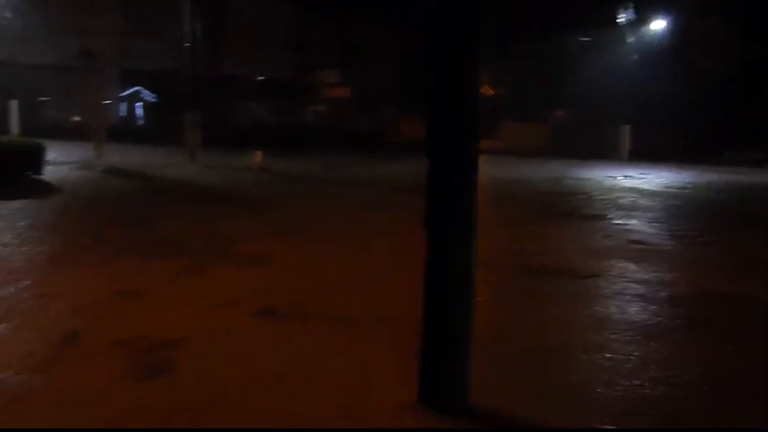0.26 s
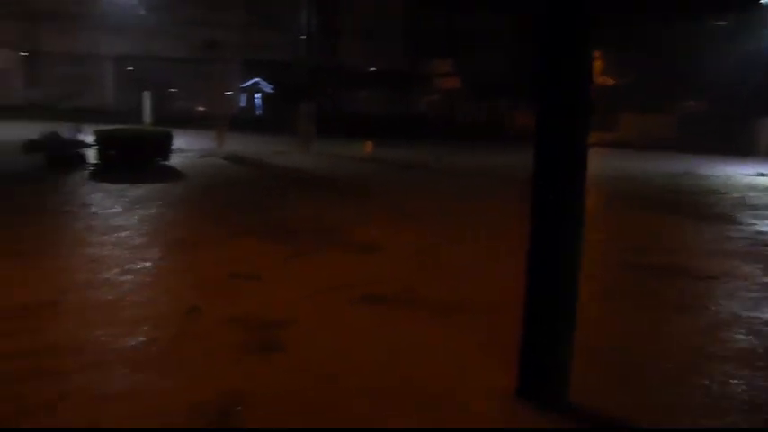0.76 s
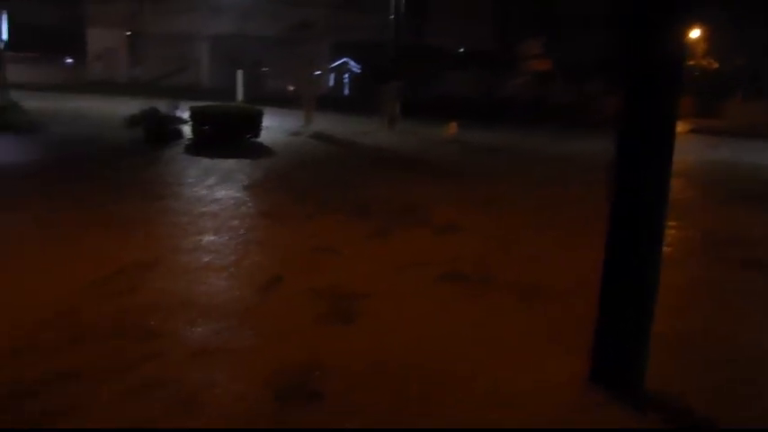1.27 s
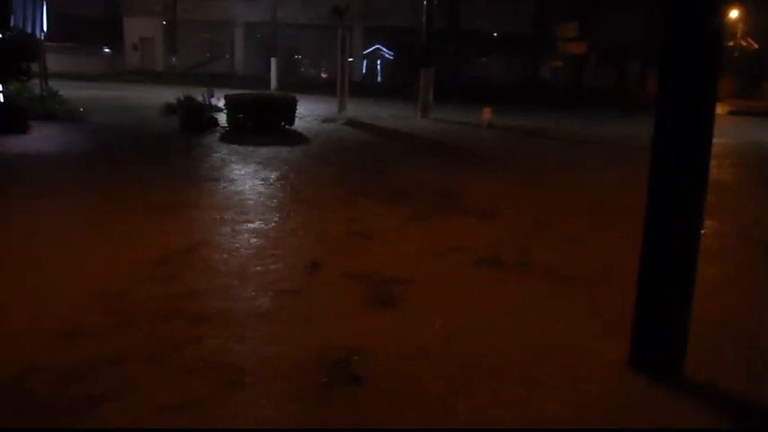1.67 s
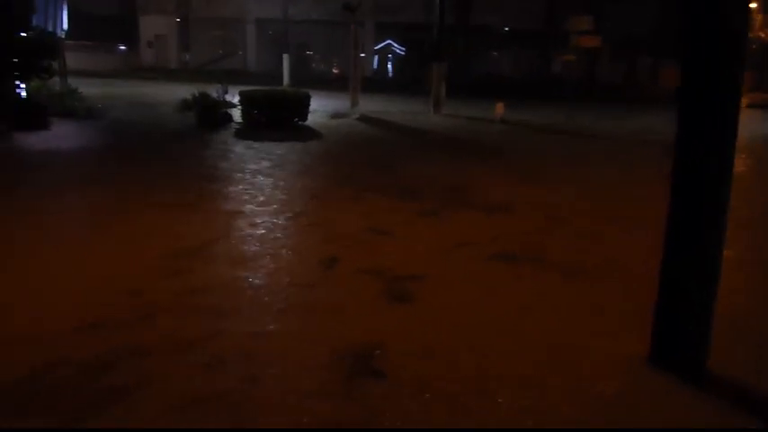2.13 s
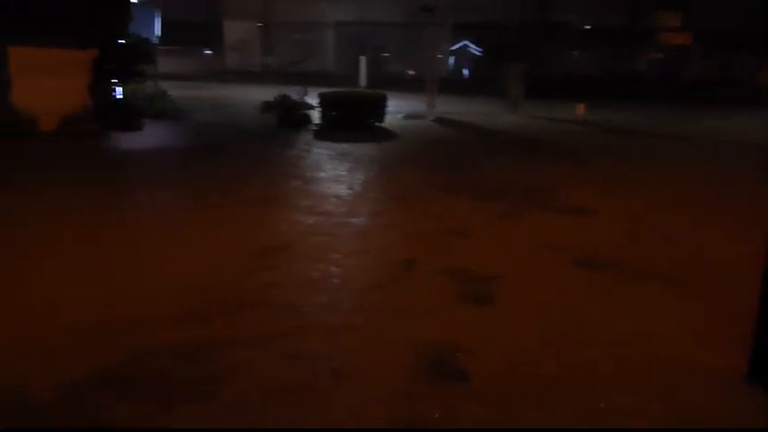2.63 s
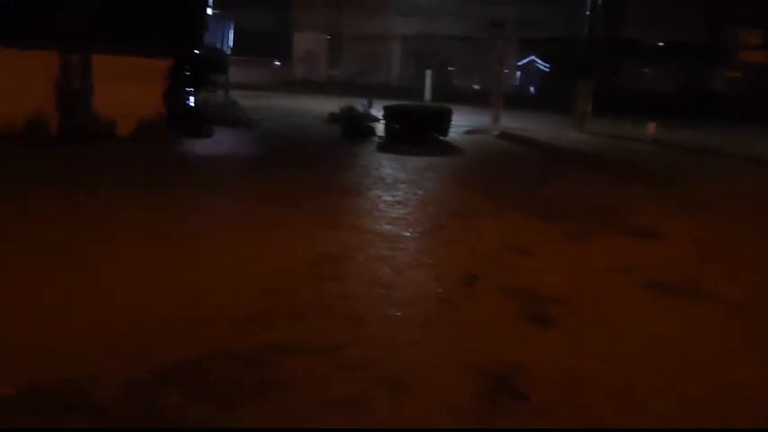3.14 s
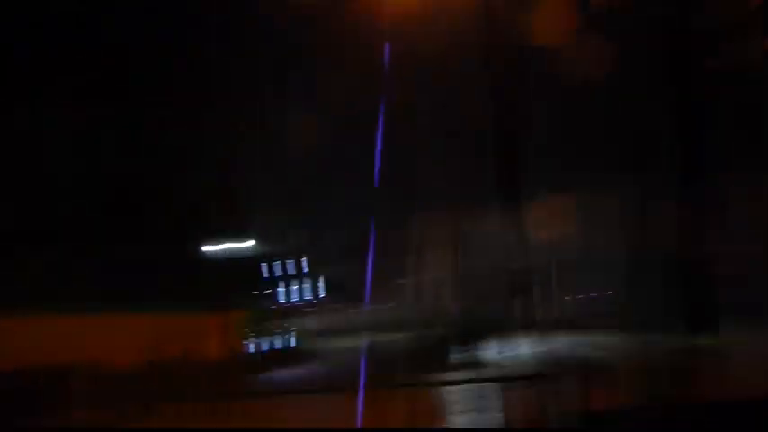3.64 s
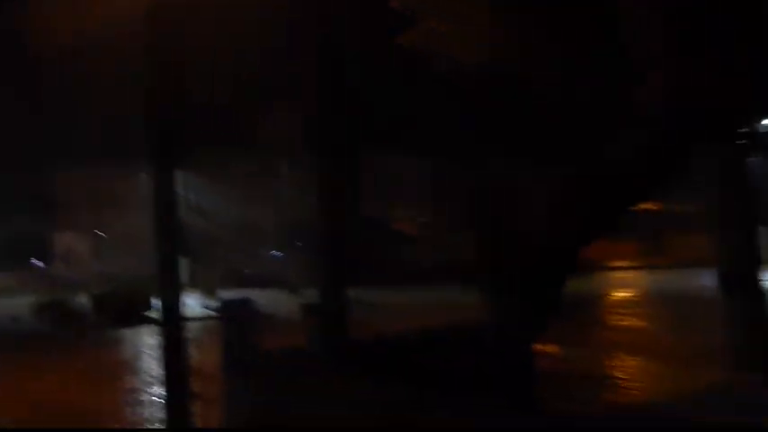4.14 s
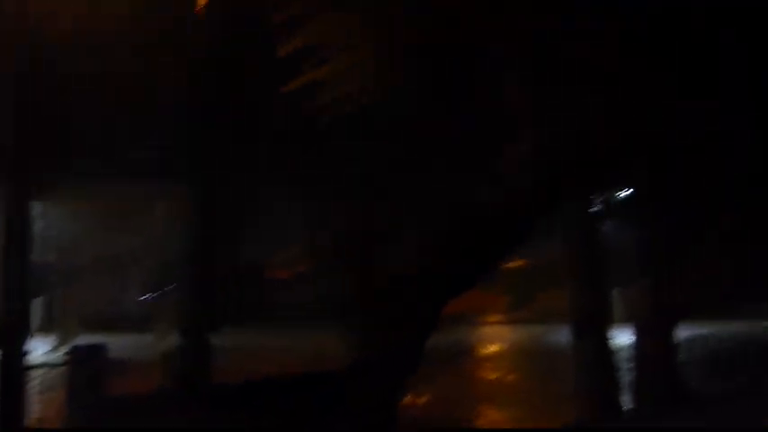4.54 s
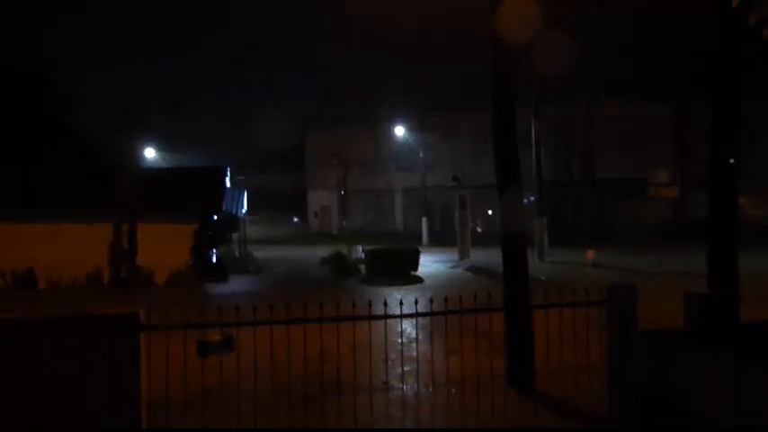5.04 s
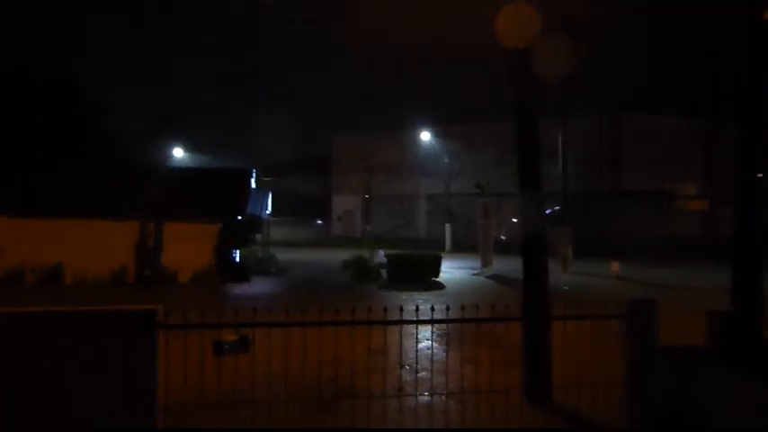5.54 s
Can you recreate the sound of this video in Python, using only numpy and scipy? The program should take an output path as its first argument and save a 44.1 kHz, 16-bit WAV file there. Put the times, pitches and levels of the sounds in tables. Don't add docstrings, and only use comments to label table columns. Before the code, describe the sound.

Heavy night rain drums on a taut umbrella overhead, then after brief silences opens into a hissing flooded street with faint bubble plinks.

```python
import sys
import numpy as np
from scipy import signal
from scipy.fft import rfft, irfft, next_fast_len
from scipy.io import wavfile
from scipy.ndimage import uniform_filter1d, map_coordinates

SR = 44100
rng = np.random.default_rng(int(sys.argv[2]) if len(sys.argv) > 2 else 0)


def master(y):
    cut = np.clip(np.atleast_2d(y).T, -1, 1)
    pcm = np.round(cut * 32767)
    wavfile.write(sys.argv[1], SR, pcm.astype(np.int16))


def gain_from_decibels(decibels):
    exponent = np.asarray(decibels, float) / 20
    return 10 ** exponent


N = 255780

# start/s, end/s
SHOTS = [
    (0, 3.2672),
    (3.8140, 4.8195),
    (4.9218, 5.81),
]
# f/Hz, likeness/0-1
SHELTERED = [(60, 0.84), (180, 0.92), (550, 1), (1650, 0.68), (4970, 0.48), (15000, 0.54)]
# f/Hz, likeness/0-1
OPEN = [(60, 0.93), (180, 0.99), (550, 0.94), (1650, 0.57), (4970, 0.21), (15000, 0.084)]


def unit(x):
    return x / np.sqrt(np.mean(x ** 2) + 1e-20)


def along(points, hz):
    f, v = np.transpose(points)
    return np.interp(np.log(hz + 1), np.log(f + 1), v)


def curves(rows):
    s, *cols = np.transpose(rows)
    return [np.interp(np.arange(N) / SR, s, c) for c in cols]


def wobble(rate):
    knots = rng.standard_normal(int(N * rate / SR) + 4)
    return map_coordinates(knots, [np.arange(N) * rate / SR])


def filtered(x, response):
    m = next_fast_len(N + 8192)
    return irfft(rfft(x, m) * response(np.fft.rfftfreq(m, 1 / SR)), m)[..., :N]


def rush(spectrum, alike, patchy_db):
    z = signal.stft(rng.standard_normal((2, N)), nperseg=512)[2]
    field = uniform_filter1d(rng.standard_normal(z.shape[1:]), size=6, axis=0)
    field = uniform_filter1d(field, size=10, axis=1)
    pair = signal.istft(z * gain_from_decibels(patchy_db * unit(field)), nperseg=512)[1][:, :N]

    def mid_side(hz):
        turn = np.arccos(np.clip(along(alike, hz), 0, 1)) / 2
        return gain_from_decibels(along(spectrum, hz)) * [np.cos(turn), np.sin(turn)]

    mid, side = filtered(pair, mid_side)
    return unit(np.array([mid + side, mid - side]))


def grains(s, db, hz, pan_db, lag_s, shape, size):
    out = []
    for side in (.5, -.5):
        start = (s + side * lag_s) * SR
        at = np.ceil(start)[:, None] + np.arange(size)
        cycles = (at - start[:, None]) / SR * hz[:, None]
        wave = gain_from_decibels(db + side * pan_db)[:, None] * shape(cycles)
        place = np.clip(at, 0, N).astype(int)
        out.append(np.bincount(place.ravel(), wave.ravel(), N + 1)[:N])
    return np.array(out)


def bursts(s, db, t60):
    hits = np.bincount(np.round(s * SR).astype(int), gain_from_decibels(db) ** 2, N)[:N]
    power = signal.lfilter([1], [1, -gain_from_decibels(-120 / (abs(t60) * SR))], hits)
    return np.sqrt(np.abs(power))


def heavy_drops(count=150):
    # t/s, peak level/dB, cloth pitch f/Hz, left-right/dB
    big_drops = [(0.0288, -10, 920, -3), (0.0638, 3, 960, -3.5), (0.0665, -19, 920, -2),
                 (0.1099, -4, 1000, -3), (0.202, -7.5, 1100, 2.5), (0.5109, -9.5, 1700, -1),
                 (0.5807, -10, 960, -3), (0.6293, -2, 1300, -2), (0.6978, -13, 960, -0.5),
                 (0.7794, -18, 1050, 4), (0.9197, -15, 1160, 0), (0.9464, -7.5, 1050, -5),
                 (1.0856, -5, 1300, -1), (1.4631, -8.5, 1000, 1), (1.53, -12.5, 1000, -3.5),
                 (1.5702, -7, 1100, -1), (1.6254, -3.5, 1380, -4), (1.709, -6, 1380, -5),
                 (1.7164, -5.5, 850, -0.5), (1.773, -10, 960, 1), (1.7793, -5, 920, -3.5),
                 (1.8651, -8, 960, -2.5), (1.9828, -0.5, 1100, -3), (2.2033, -10, 1050, 0.5),
                 (2.2585, -6.5, 1220, 6), (2.3478, -6.5, 1300, -6), (2.4555, -3.5, 1050, -5.5),
                 (2.8566, -4.5, 1220, -4.5), (3.0732, -7.5, 1000, -4), (3.1092, -6.5, 1380, -6)]
    usual_db, usual_hz = -10.5, 1084
    when = (np.arange(count) + 2 * rng.random(count)) * SHOTS[0][1] / (count + 1)
    luck = rng.standard_normal((count, 3))
    mid_db = usual_db + 2.5 * np.clip(luck[:, 0], -3, 1.5)
    mid_hz = usual_hz * np.exp(.14 * luck[:, 1])
    middling = np.column_stack([when, mid_db, mid_hz, .2 + luck[:, 2]])
    s, db, hz, pan_db = np.transpose(np.vstack([big_drops, middling]))
    crack_db = -13 - 7.5 * np.log2(hz / usual_hz) - .4 * (db - usual_db)
    crack_db = crack_db + 7.5 * np.tanh(rng.standard_normal(len(s)))
    return s, db, hz, crack_db, pan_db


def push(cycles):
    envelope = (1 - np.exp(-cycles / .11)) * np.exp(-(cycles / 1.2) ** 2.2)
    return envelope * np.sin(2 * np.pi * (.9 * cycles) ** .8)


def umbrella(count=2400):
    # t/s, level/dB
    patter_level = [(0, -18.5), (.12, -32.5), (.42, -24.5), (.85, -26.5), (1.2, -25), (1.33, -24),
                    (1.5, -24), (1.69, -19.5), (1.81, -26.5), (2.25, -22.5), (2.41, -22.5), (2.7, -20),
                    (2.9, -22.5), (3.02, -20.5), (3.26, -25.5)]
    # f/Hz, level/dB per Hz
    crack_spectrum = [(600, -7.5), (1500, 0.5), (3000, 2.5), (6000, -2.5), (10000, -5.5), (13000, -19.5),
                      (16000, -39)]
    s, db, hz, crack_db, pan_db = heavy_drops()
    lag_s = 4e-5 * rng.standard_normal(len(s))
    big = grains(s + .03 / hz, db + .2, hz, pan_db + .97, lag_s, push, size=220)
    crack = bursts(s + .09 / hz, db + crack_db + 1, t60=.0058)

    chance = np.column_stack([rng.random((count, 2)), rng.standard_normal((count, 3))])
    small_s = chance[:, 0] * SHOTS[0][1]
    small_db = -3.5 * np.log(chance[:, 1] + .07)
    small_hz = 1000 * np.exp(.31 * chance[:, 2])
    patter = grains(small_s, small_db, small_hz, 2.5 * chance[:, 3], 6e-5 * chance[:, 4], push, size=220)
    fizz = unit(bursts(small_s, 1.2 * small_db, t60=.0039))

    flurries = unit(uniform_filter1d(rng.standard_normal(N), size=1800))
    level = gain_from_decibels(curves(patter_level)[0] + .96 * flurries)
    thumps = big + level * gain_from_decibels(-5.5) * unit(patter)
    burst_level = crack + level * gain_from_decibels(-7.5) * fizz
    return thumps + burst_level * rush(crack_spectrum, SHELTERED, patchy_db=1.5)


def street():
    # t/s, rain on the water level/dB, wind level/dB
    weather = [(0, -28, -33.5), (.5, -30, -30), (.85, -30.5, -29), (1.25, -27.5, -27.5), (1.5, -31, -31.5),
               (1.85, -27, -31.5), (2.4, -27.5, -32.5), (2.75, -27, -35), (3.05, -29.5, -27.5),
               (3.26, -26, -36), (3.82, -27, -38.5), (4.3, -26.5, -46), (4.81, -26.5, -47),
               (4.93, -24, -25), (5.1, -26, -29.5), (5.28, -26.5, -25), (5.47, -27, -32.5),
               (5.8, -26.5, -33)]
    # f/Hz, level/dB per Hz
    hiss_spectra = [
        [(88, -34), (150, -3.5), (275, -5), (734, -4), (1430, -2), (2040, -10.5), (9970, -14), (12900, -18.5),
         (13900, -27), (15000, -27.5), (16300, -55.5)],
        [(88, -53), (150, -13), (270, -5), (349, -3.5), (377, -6.5), (432, -3), (810, -3), (1550, -5.5),
         (11200, -9.5), (14800, -19.5), (16300, -51.5)],
        [(88, -34), (150, -18), (441, -5), (558, -7.5), (640, -5.5), (810, -8), (1740, -11), (10800, -12),
         (14500, -20.5), (15300, -47.5), (16300, -99)],
    ]
    # f/Hz, level/dB per Hz
    roar_spectrum = [(15, -47.5), (30, -16.5), (60, -11.5), (110, -2), (200, -2.5), (320, 0.5),
                     (500, -14.5), (900, -35.5)]
    spray_db = [0.5, -0.5, -3]
    calm_db = [-30.5, -32.5, -29.5]
    spray_per_wind = [-.1, -.1, -0.81]
    turn_db = [-2, -4.5, -3.5]
    t = np.arange(N) / SR
    hiss_db, roar_db = curves(weather)
    shot = np.clip(np.searchsorted([end for _, end in SHOTS], t - .02), 0, 2)

    gust_db = roar_db - np.take(calm_db, shot)
    bright_db = np.take(spray_db, shot) + np.take(spray_per_wind, shot) * gust_db + 1.5 * wobble(5.4)
    since_s = np.abs(t - np.take([start for start, _ in SHOTS], shot))
    bright_db = bright_db + np.take(turn_db, shot) * np.exp(-since_s / .17)

    hiss = np.choose(shot, [rush(hiss_spectra[0], SHELTERED, patchy_db=2.0),
                            rush(hiss_spectra[1], OPEN, patchy_db=1.2),
                            rush(hiss_spectra[2], OPEN, patchy_db=.5)])
    spray = filtered(hiss, lambda hz: 1 / (1 + (7500 / (hz + 1)) ** 4))
    water = gain_from_decibels(hiss_db + 3.5) * (hiss + (gain_from_decibels(bright_db) - 1) * spray)
    roar = gain_from_decibels(roar_db - 3.0 + 1.3 * wobble(6)) * rush(roar_spectrum, OPEN, patchy_db=1.0)
    return water + roar


def ring(rise, life, glide):
    def wave(c):
        envelope = (1 - np.exp(-c / rise)) * np.exp(-c / life)
        return envelope * np.sin(2 * np.pi * c * (1 + glide * c / life))
    return wave


def splashes():
    # t/s, peak level/dB, pitch f/Hz, left-right/dB
    near_splashes = [(0.147, -13, 10200, 0), (0.7502, -29.5, 5900, 0.0), (1.2002, -14, 5040, 0.5),
                     (1.5763, -19, 8360, 1.5), (1.899, -12, 10770, -7), (1.943, -15, 8700, -6),
                     (2.0285, -15, 6910, -11), (2.0773, -28, 7010, -10.5), (2.3371, -18, 7950, -2),
                     (2.394, -19.5, 5120, 2), (2.625, -24.5, 6530, -3), (3.0257, -18, 9980, 7.5),
                     (4.706, -21, 7550, -2.5), (4.812, -6.5, 10400, -2), (5.5507, -17, 10700, 0.0),
                     (5.5875, -12, 8870, -1.5)]
    spit_spectrum = [(2500, -30), (5500, -5), (10000, 0), (14000, -4), (16000, -12)]  # f/Hz, level/dB
    s, db, hz, pan_db = np.transpose(near_splashes)
    lag_s = 5e-5 * rng.standard_normal(len(s))
    tick = grains(s + .0009, db - 1.5, hz, pan_db, lag_s, ring(rise=.8, life=1.6, glide=0), size=200)
    spit = uniform_filter1d(bursts(s + .0008, db + 1.5, t60=.008), size=30)
    return tick + spit * rush(spit_spectrum, OPEN, patchy_db=3)


def lulls(half_s=.011):
    # t/s, depth level/dB
    gaps = [(0.301, -5), (0.472, -5), (0.712, -3), (1.333, -3), (1.518, -2), (1.597, -3.5), (1.739, -4),
            (2.013, -7), (2.282, -2), (2.59, -3.5), (2.702, -4), (3.054, -3.5)]
    t = np.arange(N) / SR
    return gain_from_decibels(sum(db * np.exp(-((t - s) / half_s) ** 2) for s, db in gaps))


def puddles(count=260):
    # t/s, peak level/dB, pitch f/Hz
    near_bubbles = [
        (3.85, -36, 1033),
        (3.885, -32, 1960),
        (4.095, -33, 1324),
        (4.33, -33, 2470),
        (4.49, -37.5, 2160),
        (4.71, -32, 3400),
    ]
    s, db, hz = np.transpose(near_bubbles)
    near = grains(s, db + 15.0, hz, 0 * s, 0 * s, ring(rise=4.2, life=11.3, glide=.031), size=1500)
    chance = np.column_stack([rng.random(count), rng.standard_normal((count, 4))])
    open_s = SHOTS[1][0]
    far_s = open_s + chance[:, 0] * (N / SR - open_s)
    far_db = -34 + 3 * chance[:, 1]
    far_hz = 1600 * np.exp(.65 * chance[:, 2])
    far = grains(far_s, far_db, far_hz, 3 * chance[:, 3], 8e-5 * chance[:, 4],
                 ring(rise=3.5, life=7, glide=.1), size=1200)
    return near + far


def scene():
    return lulls() * (street() + umbrella()) + puddles() + splashes()


def patchy_treble(x, width=32, size=326):
    # t/s, share of difference bands lost/0-1
    dropouts = [(0, .5), (.14, 0), (.2, .6), (.55, .5), (.68, 0), (.8, .8), (1.8, .45), (2.85, .55),
                (2.93, 0), (3.26, .3), (3.95, 0), (4.1, .5), (4.8, .5), (4.9, 0), (5.42, 0), (5.5, .55)]
    pair = np.pad([x[0] + x[1], x[0] - x[1]], ((0, 0), (size, 0))) / 2
    hz, t, z = signal.stft(pair, SR, window="cosine", nperseg=2048)
    luck = uniform_filter1d(rng.standard_normal((2, len(hz) // width + 1, len(t))), size=2)
    rank = luck.ravel().argsort().argsort().reshape(luck.shape) / luck.size
    hunger = np.interp(t, *np.transpose(dropouts))
    share = (hunger + .03) * np.array([.2, .95])[:, None, None]

    flutter_hz = 800 * uniform_filter1d(rng.standard_normal((2, len(t))), size=2)
    top_hz = np.where(t < SHOTS[1][0], 14900 - 1500 * hunger, 15100 - 500 * hunger)
    top_hz = top_hz - 1800 * np.exp(-((t - 5.24) / .1) ** 2) + flutter_hz
    band_hz = (np.arange(len(hz)) // width * width * hz[1])[:, None]
    treble = band_hz > 6500
    lost = (np.repeat(rank, width, axis=1)[:, :len(hz)] < share) & treble
    empty = lost | (band_hz + 350 > top_hz[:, None])
    refill = np.where(treble, (1 - share) ** -.25, 1)
    mid, side = signal.istft(z * ~empty * refill, SR, window="cosine", nperseg=2048)[1][:, size:size + N]
    return np.array([mid + side, mid - side])


def band_limit(x):
    return signal.sosfilt(signal.butter(12, 16100, fs=SR, output="sos"), x)


def record(dry):
    heard = filtered(dry, lambda hz: (1j * hz / (1j * hz + 55)) ** 2) * gain_from_decibels([[-.55], [.55]])
    power = signal.lfilter([1 / (.035 * SR)], [1, 1 / (.02 * SR) - 1], np.mean(heard ** 2, axis=0))
    ducked = heard / (1 + np.abs(power) / gain_from_decibels(-17.5) ** 2) ** .33
    ducked = ducked / (1 + np.abs(ducked / .9) ** 4) ** .25
    t = np.arange(N) / SR
    fade_s = .004
    kept = sum((t >= start) * np.clip((end - t) / fade_s, 0, 1) for start, end in SHOTS)
    return band_limit(patchy_treble(ducked) * kept)


dry = scene()
out = record(dry)
master(out)
```